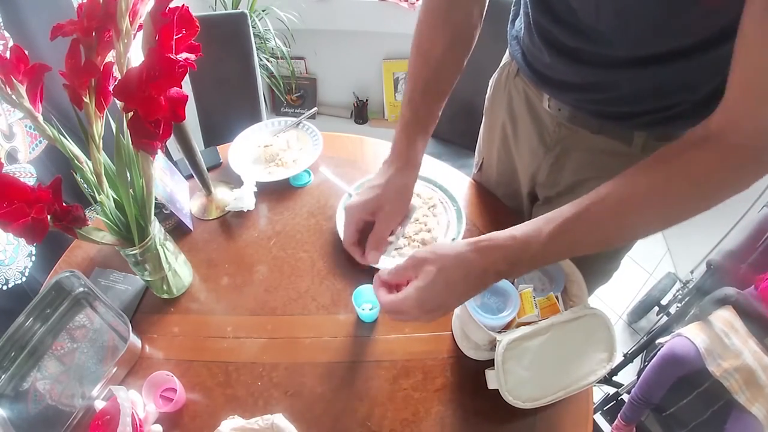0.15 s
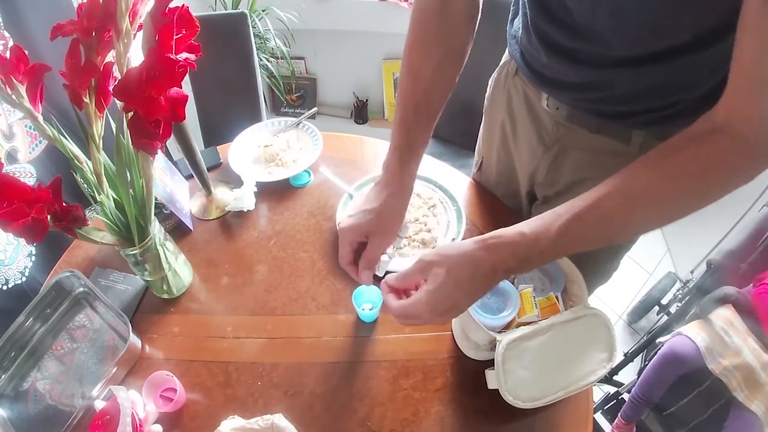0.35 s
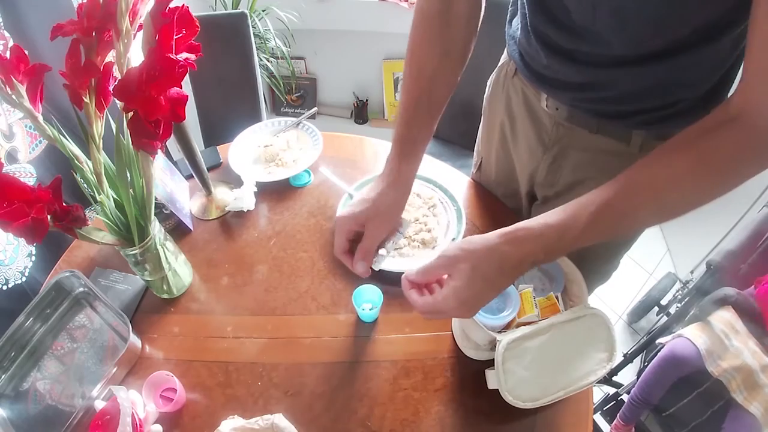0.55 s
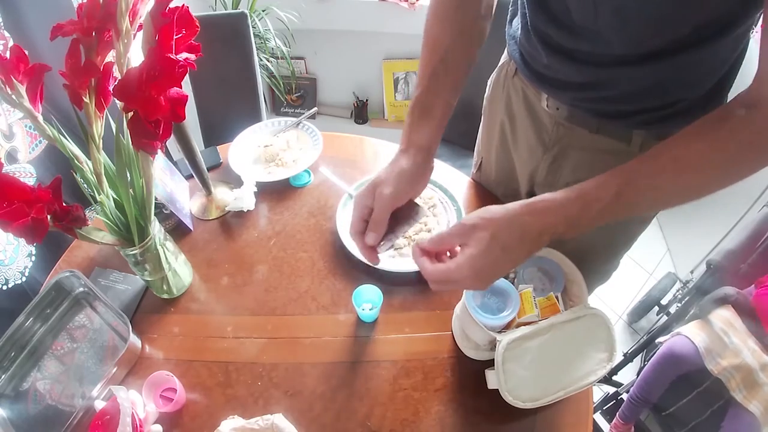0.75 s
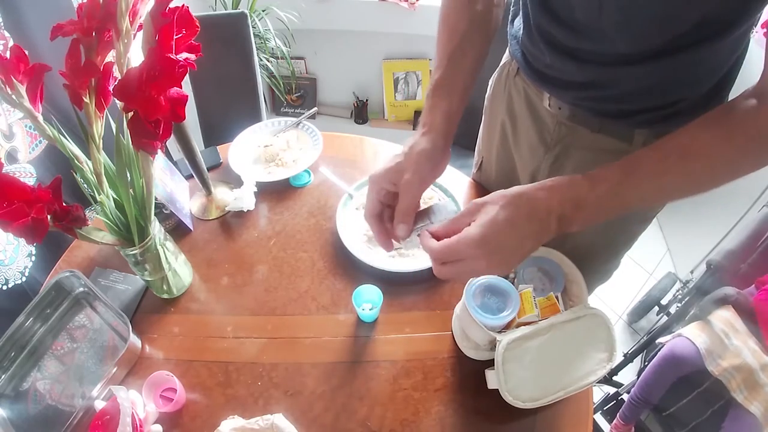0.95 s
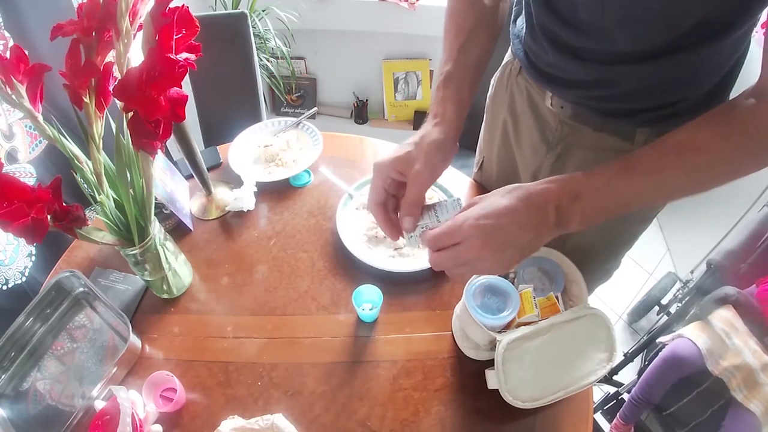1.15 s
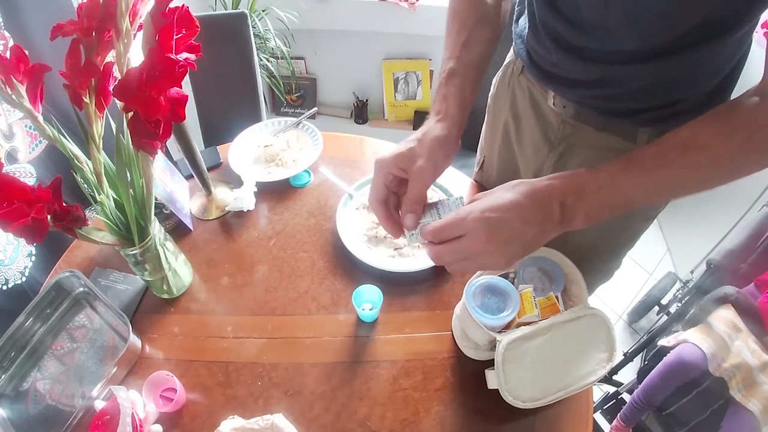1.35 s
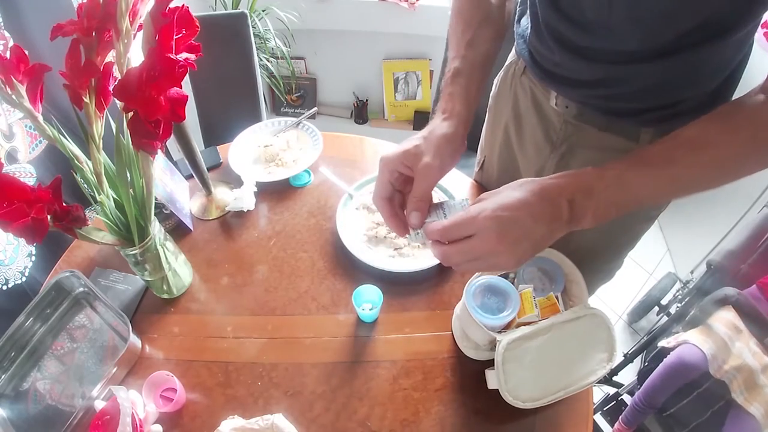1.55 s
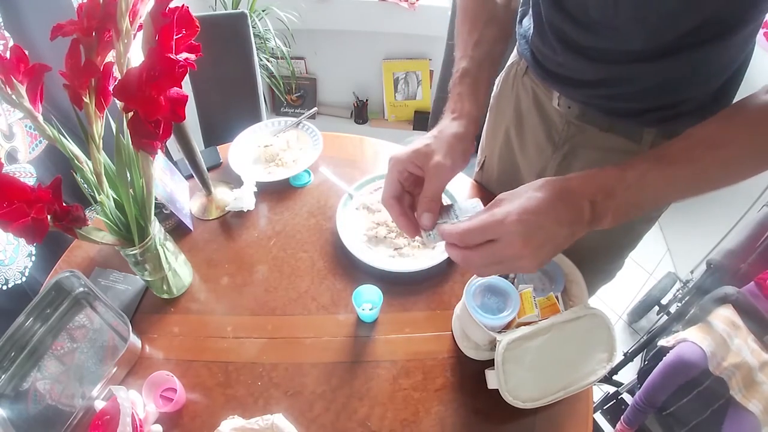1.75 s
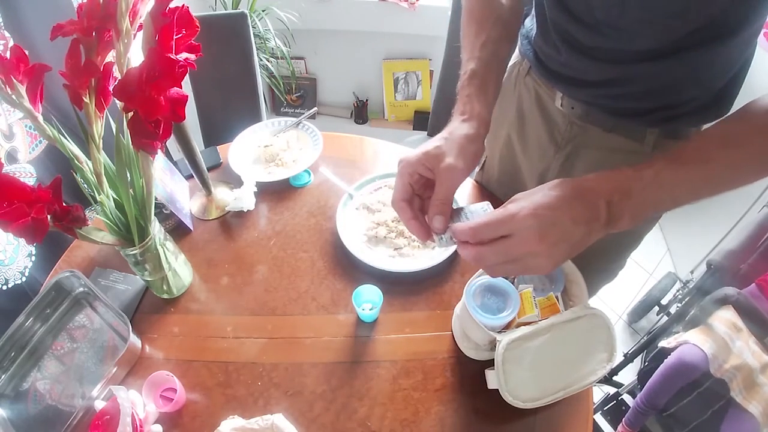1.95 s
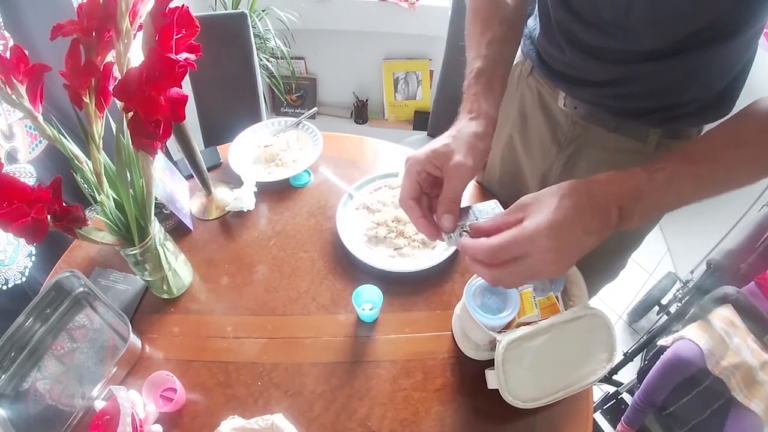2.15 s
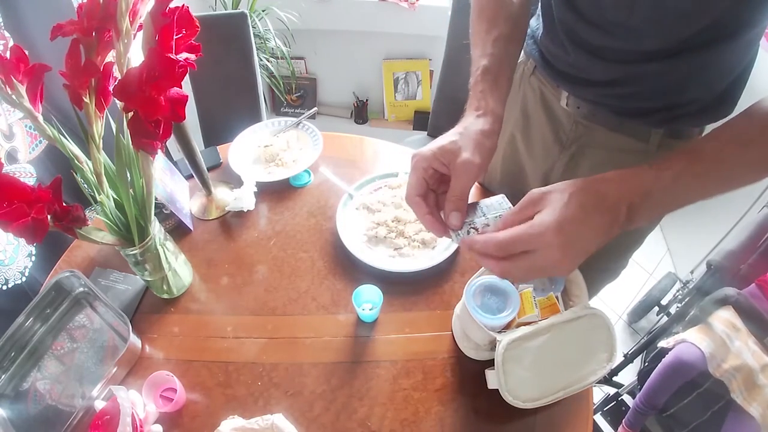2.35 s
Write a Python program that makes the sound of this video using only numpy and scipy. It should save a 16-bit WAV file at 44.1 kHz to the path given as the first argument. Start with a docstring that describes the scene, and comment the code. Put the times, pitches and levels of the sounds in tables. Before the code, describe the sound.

Foil blister pack crackling at a table. A faint thin squeak and light crinkles open, then a very sharp, bright snap at 0.25 s and smaller ones at 0.4 to 0.65 s. After a soft rub, plastic pops and crinkles come around 0.95 s, a dull stumbling knock at 1.13 s, crisp crackles at 1.3 s, strong snaps at 1.66 to 1.77 s, then lighter pops until 2.3 s. Small room, quiet air, close mono microphone.

```python
"""In a small live room, tablets are snapped and pressed out of a foil blister pack over a plate.
Foil and pockets are impulses and grain bursts through material colours: snaps, crinkles, hollow pops.
Tablet ticks and a dull knock ring decaying modes; soft scuffs are filtered grains, slips gliding noise.
The direct sound stands 3 dB above the room's tail, over quiet room tone with faint deep swells.
The microphone is mono and keeps nothing above 15.8 kHz."""
import sys
import numpy as np
from scipy import signal
from scipy.fft import rfft, irfft, next_fast_len
from scipy.io import wavfile
from scipy.ndimage import uniform_filter1d

SR = 44100
rng = np.random.default_rng(int(sys.argv[2]) if len(sys.argv) > 2 else 0)


def materialize(psi):
    """Save the field psi as 16-bit PCM at rate SR to the path in sys.argv[1].

    A 1-D psi becomes a single channel; in a 2-D psi each row is a channel.
    """
    bounded = np.clip(np.atleast_2d(psi).T, -1, 1)
    quanta = np.round(bounded * 32767).astype(np.int16)
    wavfile.write(sys.argv[1], SR, quanta)


N = 105840
TIME = np.arange(N) / SR  # s

# Steady air of the room at the microphone. Each row: frequency in Hz, relative level in dB.
ROOM_TONE_COLOUR = [(20, -6), (35, -4.5), (60, -13), (110, -30), (145, -0.5), (200, -2.5), (280, -9.5),
                    (500, -10), (1200, -7), (2200, -13.5), (4000, -12.5), (7500, -10), (9000, -24),
                    (12000, -44), (15000, -60)]
ROOM_TONE_DB = -61  # rms
# Deep swells. Each row: middle in seconds, length in seconds, peak rms level in dB.
RUMBLES = [(1.11, 0.19, -64), (1.274, 0.066, -66), (1.583, 0.053, -64), (2.064, 0.22, -74)]
# Spectrum of the swells. Each row: frequency in Hz, relative level in dB.
RUMBLE_COLOUR = [(15, 5), (28, 9), (45, -1), (80, -32), (200, -62), (1000, -120)]

# How long the room rings. Each row: frequency in Hz, time to fall 60 dB in seconds.
ROOM_T60 = [(200, 0.42), (1500, 0.38), (4000, 0.31), (7500, 0.32), (14000, 0.39)]
TAIL_DB = -3  # energy of the tail against the direct sound
TAIL_DELAY_S, TAIL_BUILD_S = 0.0004, 0.00033

# Bright ring of the foil sheet. Each row: frequency in Hz, relative level in dB.
FOIL_COLOUR = [(200, -23.5), (1000, -57), (2000, -38), (3200, -15.5), (4400, -7), (5300, -2.5), (7000, 4),
               (8100, -1), (8700, -9), (9500, -10), (11500, -22.5), (15000, -31)]
# Duller ring of the plastic. Each row: frequency in Hz, relative level in dB.
PLASTIC_COLOUR = [(150, -36), (500, -30), (1100, -14.5), (1800, -6), (3000, 2), (4400, 2), (6000, 3),
                  (7500, -16.5), (10000, -18.5), (15000, -73)]
# Treble taken off quieter sounds. Each row: frequency in Hz, share of the full loss from 0 to 1.
QUIET_SHAPE = [(7500, 0.22), (13000, 0.45)]
QUIET_LOSS = 0.67  # full loss in dB for each dB below 0, before the share above

# Bursts of crinkling. Each row: start in seconds, length in seconds, rms in dB, plastic share 0 to 1.
CRINKLES = [(0, 0.024, -49, 0.26), (0.106, 0.052, -56.5, 0.77), (0.167, 0.071, -57, 0.74),
            (0.197, 0.046, -51, 0), (0.255, 0.053, -41.5, 0.07), (0.407, 0.018, -42.5, 0.06),
            (0.431, 0.032, -58, 0.03), (0.563, 0.047, -50, 0.16), (0.595, 0.048, -45.5, 0.06),
            (0.648, 0.05, -39, 0.06), (0.699, 0.029, -47, 0.29), (0.899, 0.025, -58, 0.5),
            (0.919, 0.032, -50, 0.08), (0.944, 0.027, -41.5, 0.51), (1.003, 0.022, -46.5, 0.24),
            (1.029, 0.021, -46.5, 0), (1.093, 0.03, -52, 0.47), (1.213, .02, -59, 0),
            (1.283, 0.024, -35.5, 0.04), (1.311, 0.03, -44, 0.15), (1.346, 0.03, -41.5, 0.11),
            (1.377, 0.033, -47.5, 0.06), (1.462, 0.12, -63, 0.55), (1.614, 0.024, -55.5, 0.07),
            (1.642, 0.068, -46, 0.04), (1.699, 0.023, -38.5, 0.06), (1.727, 0.032, -41.5, 0.09),
            (1.753, 0.015, -37, 0.1), (1.769, 0.03, -44.5, 0.34), (1.934, 0.045, -52.5, 0.16),
            (1.988, 0.03, -46.5, 0.12), (2.022, 0.049, -48.5, 0.31), (2.086, 0.029, -46.5, 0.1),
            (2.117, 0.023, -53.5, 0.4), (2.131, 0.014, -48, 0.37), (2.276, 0.016, -55, 0.35)]
CRINKLE_PER_S, CRINKLE_SPREAD_DB, CRINKLE_FALL_DB = 3600, 1.5, 2.5
CLUMP_S, CLUMP_DB = 0.003, 2.5  # spacing and spread of the slow unevenness in any run of grains

# Soft body scuffs. Each row: start in seconds, length in seconds, rms in dB, upper edge in Hz.
SCUFFS = [(0, 0.041, -62.5, 1530), (0.112, 0.067, -59, 1290), (0.273, 0.14, -61, 2300),
          (0.739, 0.058, -64, 1260), (0.902, 0.09, -57, 1610), (1.086, 0.034, -57, 880),
          (1.146, 0.05, -54, 1380), (1.738, 0.17, -64, 1490), (1.92, 0.063, -64.5, 218),
          (2.016, 0.053, -59.5, 1510), (2.089, 0.081, -66, 620)]
# Spectrum of the rubbing before its upper edge. Each row: frequency in Hz, relative level in dB.
SCUFF_COLOUR = [(100, -15.5), (160, -7), (260, -3), (380, 1), (600, 0.5), (950, -1.5), (1500, 4),
                (4000, 7.5)]
SCUFF_PER_S, SCUFF_SPREAD_DB, SCUFF_FALL_DB = 2500, 2.5, -0.5  # a negative fall swells

# A thin squeak, then a soft hollow rub. Each row: start in seconds, length in seconds, rms in dB,
# first frequency in Hz, last frequency in Hz, noise width to each side in Hz.
SLIDES = [(0, .05, -53.5, 3480, 3850, 150), (.745, .16, -66.5, 510, 220, 110)]
SLIDE_EDGE, SLIDE_FALL_DB = 0.2, 8  # share of the length spent in both fades; fall over the slide

# Hollow pops of plastic pockets. Each row: start in seconds, energy in dB, main mode in Hz.
POPS = [(0.0816, -29.5, 2940), (0.9563, -22.5, 2200), (0.965, -26, 2840), (1.1, -27, 3520),
        (1.1574, -27.5, 3140), (1.1769, -20, 4600), (1.1808, -19.5, 4520), (1.1946, -25.5, 2870),
        (1.199, -26, 3700), (1.512, -22.5, 4200), (1.6616, -23.5, 3500), (1.7981, -23, 3440),
        (2.0223, -23, 2450), (2.0514, -21, 3600), (2.136, -24.5, 3280), (2.1402, -22.5, 4000)]
# Modes of a pocket. Each row: ratio to the main mode, relative level in dB.
POCKET_MODES = [(1.018, -6.5), (1.246, -4), (0.99, 2), (0.72, -15)]
POCKET_T60_S, POCKET_BUZZ = 0.0073, 0.16  # ring time; size of the ragged buzz after the flip
POCKET_CRACK_DB = -3.5  # energy of the crack against the modes
POCKET_TOP = 2.06  # a pop dulls above this multiple of its main mode

# Light contacts with plate, table and pack. Each row: start in seconds, then the modes of what is
# hit, each with frequency in Hz, level in dB, time to fall 60 dB in seconds.
TICKS = [(0.0958, [(5140, -35.5, 0.021), (6100, -38, 0.018), (7890, -35.5, 0.021), (10050, -46, 0.018)]),
         (0.5115, [(1590, -48, 0.053), (1424, -51, 0.073), (5600, -34, 0.0079)]),
         (1.5085, [(5040, -43, 0.029)]), (2.137, [(4700, -37, .007), (10400, -36, 0.0029),
         (13000, -44, 0.0018)])]
TICK_ROUGH, TICK_ATTACK_S = 2.2, 0.00013  # strength of the phase wander; onset time

# Single snaps of foil and tablet. Each row: start in seconds, energy in dB, plastic share 0 to 1.
SNAPS = [(0.179, -28, 0.03), (0.2462, -20, 0), (0.2496, -2.5, 0), (0.2503, -2.5, .03), (0.252, -3, 0.06),
         (0.4018, -11.5, 0.08), (0.4068, -27, 0.4), (0.4594, -26.5, 0), (.5112, -16.5, 0.02),
         (0.579, -21, 0), (0.638, -22, 0.03), (0.6493, -16, 0.04), (0.6508, -19, 0.22), (.9244, -33, 0),
         (0.929, -27, 0), (0.9487, -19.5, .3), (0.954, -30, 0.4), (0.959, -16, 0.14), (0.9999, -20, 0.44),
         (1.007, -24, 0.5), (1.011, -22, 0.1), (1.0188, -23, 0), (1.024, -14.5, 0.12),
         (1.2788, -15.5, 0.04), (1.2845, -18.5, 0), (1.29, -14.5, 0.1), (1.294, -15, 0.04),
         (1.381, -17, 0.1), (1.468, -23, 0.11), (1.5127, -28.5, 0.09), (1.6393, -23, 0),
         (1.6629, -11.5, 0.2), (1.6993, -7.5, 0.05), (1.7056, -11.5, 0.12), (1.7615, -11.5, 0.06),
         (1.9383, -29, .03), (1.982, -21.5, 0.13), (1.9869, -18, 0.01), (2.0943, -20, 0.08),
         (2.277, -27.5, 0.01)]
SNAP_T60_S, SNAP_BUZZ = 0.0082, 0.17  # the sheet's short buzz after a buckle, and its size

# A hand bumps plate and table. Each row: start in seconds, energy in dB, hardness in dB per octave.
KNOCKS = [(1.1255, -23, 0.5), (1.1298, -20, 6), (1.1385, -21.5, 4.5), (1.1505, -22.5, 1), (1.1665, -28, 0)]
# Modes of the bumped things. Each row: frequency in Hz, level in dB, time to fall 60 dB in seconds.
KNOCK_MODES = [(417, 1, 0.037), (606, -1, 0.015), (940, 2, 0.016), (1314, -4.5, 0.019), (1617, -8.5, 0.025)]
KNOCK_ATTACK_S = 0.001

LOW_CUT_HZ = 123  # small things radiate no bass
TOP_HZ = 15800  # band limit at the microphone


def amp(db):
    """Decibels as an amplitude factor."""
    return 10 ** (np.asarray(db) / 20)


def norm(x):
    """x with energy 1."""
    return x / np.sqrt(np.sum(x ** 2) + 1e-20)


def decay(t, t60):
    """An exponential fade that falls 60 dB in t60 seconds."""
    return np.exp(-np.log(1000) * t / t60)


def along(points, hz):
    """Values between (Hz, value) points, on a log frequency axis."""
    f, v = np.transpose(points)
    return np.interp(np.log(hz + 1), np.log(f + 1), v)


def add(track, s, x):
    """Mix x into the track from time s."""
    i = max(0, round(s * SR))
    track[i:i + len(x)] += x[:max(0, N - i)]


def response(points, size=1024):
    """The causal, minimum-phase impulse response of a colour, by folding its cepstrum."""
    cepstrum = irfft(np.log(amp(along(points, np.fft.rfftfreq(size, 1 / SR)))))
    cepstrum[1:size // 2] *= 2
    cepstrum[size // 2 + 1:] = 0
    return irfft(np.exp(rfft(cepstrum)))


def noise(points):
    """Coloured noise of rms 1."""
    colour = amp(along(points, np.fft.rfftfreq(N, 1 / SR)))
    return norm(irfft(rfft(rng.standard_normal(N)) * colour, N)) * np.sqrt(N)


def grains(length, rate, spread_db, fall_db):
    """A run of impulses at random times, in clumps of uneven size, with a steady rise or fall."""
    u = np.linspace(0, 1, max(16, int(length * SR)))
    chance = rng.random(SR // 4)[:len(u)]
    sign, size, clump_points = rng.standard_normal((3, SR // 4))[:, :len(u)]
    clump = np.interp(TIME[:len(u)] / CLUMP_S, np.arange(len(u)), clump_points)
    level_db = spread_db * np.clip(size, -2, 2) + CLUMP_DB * clump - fall_db * u
    return (chance < rate / SR) * np.sign(sign) * amp(level_db)


def in_room(x):
    """The direct sound and its diffuse tail: noise that dies at its own pace in each band."""
    hz, t, bands = signal.stft(rng.standard_normal(SR // 2), SR, nperseg=256)
    fade = amp(-60 * t / along(ROOM_T60, hz)[:, None])
    tail = signal.istft(bands * fade, SR, nperseg=256)[1]
    tail *= 1 - np.exp(-np.maximum(TIME[:len(tail)] - TAIL_DELAY_S, 0) / TAIL_BUILD_S)
    tail = amp(TAIL_DB) * norm(tail)
    tail[0] += 1  # direct sound
    return signal.fftconvolve(x, tail)


def pack(push, plastic, db):
    """A push rings foil and plastic with the given energy; quieter sounds are duller."""
    share = np.clip(plastic, 0, 1)
    hz = np.fft.rfftfreq(512, 1 / SR)
    foil_power = norm(amp(along(FOIL_COLOUR, hz))) ** 2
    plastic_power = norm(amp(along(PLASTIC_COLOUR, hz))) ** 2
    colour_db = 10 * np.log10((1 - share) * foil_power + share * plastic_power)
    colour_db += QUIET_LOSS * db * along(QUIET_SHAPE, hz)
    ring = signal.fftconvolve(push, response(np.column_stack([hz, colour_db])))
    return amp(db) * norm(ring)


def buckle(t, buzz, t60):
    """A sharp impulse followed by a short, fading noise buzz."""
    push = buzz * rng.standard_normal(len(t)) * decay(t, t60)
    push[0] = 1
    return push


def background():
    """Steady room tone with a few faint, deep swells of low noise."""
    swell = sum(amp(db) * np.exp(-(2 * (TIME - s) / length) ** 2) for s, length, db in RUMBLES)
    return amp(ROOM_TONE_DB) * noise(ROOM_TONE_COLOUR) + swell * noise(RUMBLE_COLOUR)


def crinkles():
    """Under the thumb the foil gives way in dense runs of tiny buckles."""
    out = np.zeros(N)
    for s, length, db, plastic in CRINKLES:
        push = grains(length, CRINKLE_PER_S, CRINKLE_SPREAD_DB, CRINKLE_FALL_DB)
        energy_db = db + 10 * np.log10(length * SR)
        add(out, s, in_room(pack(push, plastic, energy_db)))
    return out


def scuffs():
    """Soft rubbing contacts: dull, dense friction grains."""
    out, colour = np.zeros(N), response(SCUFF_COLOUR)
    for s, length, db, edge_hz in SCUFFS:
        friction = grains(length, SCUFF_PER_S, SCUFF_SPREAD_DB, SCUFF_FALL_DB)
        rub = signal.fftconvolve(friction, colour)
        rub = signal.sosfilt(signal.butter(N=3, Wn=edge_hz, fs=SR, output="sos"), rub)
        add(out, s, amp(db) * np.sqrt(length * SR) * in_room(norm(rub)))
    return out


def slides():
    """Skin or pack slips over a surface: a narrow, rough resonance that glides and fades."""
    out = np.zeros(N)
    for s, length, db, first_hz, last_hz, width_hz in SLIDES:
        u = np.linspace(0, 1, int(length * SR))
        phase = 2 * np.pi * np.cumsum(first_hz * (last_hz / first_hz) ** u) / SR
        lowpass = signal.butter(N=2, Wn=width_hz, fs=SR, output="sos")
        # two slow noises on cosine and sine make a narrow band around the glide
        a, b = signal.sosfilt(lowpass, rng.standard_normal((2, N)))[:, -len(u):]
        rub = a * np.cos(phase) + b * np.sin(phase)
        rub *= signal.windows.tukey(len(u), SLIDE_EDGE) * amp(-SLIDE_FALL_DB * u)
        add(out, s, in_room(amp(db) * np.sqrt(length * SR) * norm(rub)))
    return out


def pops():
    """A plastic pocket flips: a ragged buckle drives a dull crack and a few short modes."""
    out, t = np.zeros(N), TIME[:SR // 30]
    for s, db, main_hz in POPS:
        push = buckle(t, POCKET_BUZZ, POCKET_T60_S)
        modes = sum(amp(level) * np.sin(2 * np.pi * main_hz * ratio * t * rng.normal(1, 0.0073))
                    for ratio, level in POCKET_MODES)  # each mode slightly detuned
        ring = signal.fftconvolve(push, modes * decay(t, POCKET_T60_S))
        crack = pack(push, 0.9, db + POCKET_CRACK_DB)  # mostly plastic
        pop = crack + amp(db) * norm(ring)[:len(crack)]
        top_hz = min(POCKET_TOP * main_hz, SR / 4)
        pop = signal.sosfilt(signal.butter(N=4, Wn=top_hz, fs=SR, output="sos"), pop)
        add(out, s, in_room(amp(db) * norm(pop)))
    return out


def ticks():
    """Light contacts ring briefly in a few modes, roughened by a wandering phase."""
    out, t = np.zeros(N), TIME[:SR // 4]
    for s, modes in TICKS:
        ring = np.zeros(len(t))
        for hz, db, t60 in modes:
            wander = np.cumsum(uniform_filter1d(rng.standard_normal(len(t)), size=40))
            drift = TICK_ROUGH * wander / np.sqrt(t60 * SR / 10)
            ring += amp(db) * decay(t, t60) * np.sin(2 * np.pi * hz * t + drift)
        add(out, s, in_room(ring * (1 - np.exp(-t / TICK_ATTACK_S))))
    return out


def snaps():
    """Each buckle or break is a sharp impulse with a few milliseconds of buzz."""
    out, t = np.zeros(N), TIME[:SR // 50]
    for s, db, plastic in SNAPS:
        push = buckle(t, SNAP_BUZZ, SNAP_T60_S)
        add(out, s, in_room(pack(push, plastic, db)))
    return out


def knocks():
    """A dull, stumbling knock: all contacts ring the same low modes, harder ones favour the upper."""
    out, t = np.zeros(N), TIME[:SR // 8]
    for s, db, tilt_db in KNOCKS:
        ring = np.zeros(len(t))
        for hz, level, t60 in KNOCK_MODES:
            mode_db = level + tilt_db * np.log2(hz / 1000)
            ring += amp(mode_db) * decay(t, t60) * np.sin(2 * np.pi * (hz * t + rng.random()))
        attack = 1 - np.exp(-t / KNOCK_ATTACK_S)
        add(out, s, in_room(amp(db) * norm(ring * attack)))
    return out


def scene():
    """All handling without its bass, over the room tone, the same in both channels."""
    handling = crinkles() + scuffs() + slides() + pops() + ticks() + snaps() + knocks()
    low_cut = signal.butter(N=3, Wn=LOW_CUT_HZ, btype="high", fs=SR, output="sos")
    mono = background() + signal.sosfilt(low_cut, handling)
    return np.array([mono, mono])


def record(dry):
    """The microphone's signal keeps nothing above its band limit."""
    m = next_fast_len(N + SR // 4)  # padded so that the filter does not wrap round
    return irfft(rfft(dry, m) * (np.fft.rfftfreq(m, 1 / SR) < TOP_HZ), m)[:, :N]


dry = scene()
out = record(dry)
materialize(out)
```